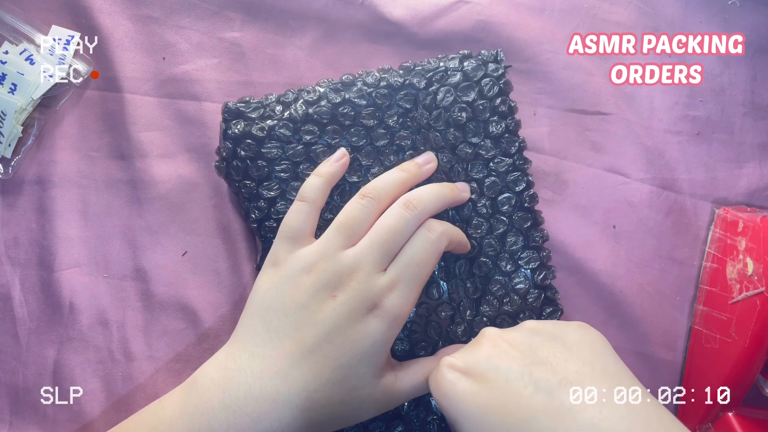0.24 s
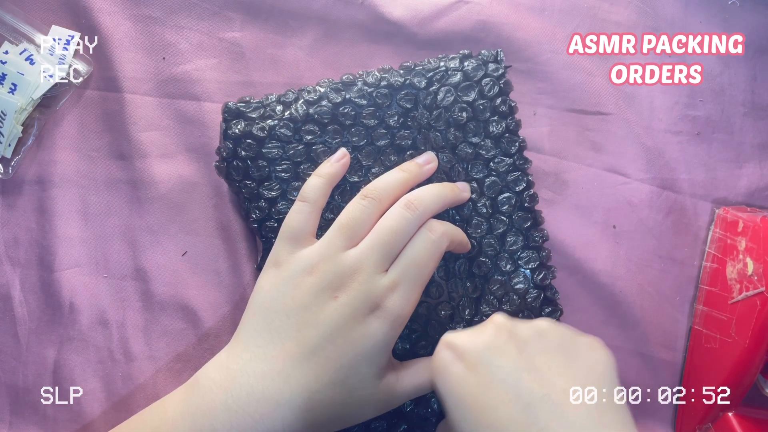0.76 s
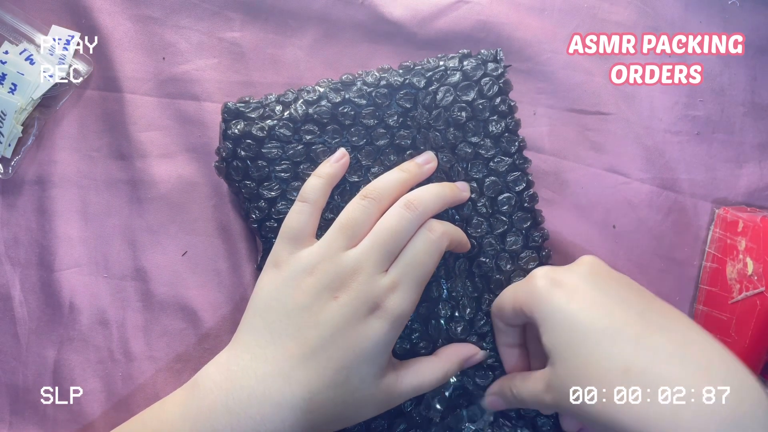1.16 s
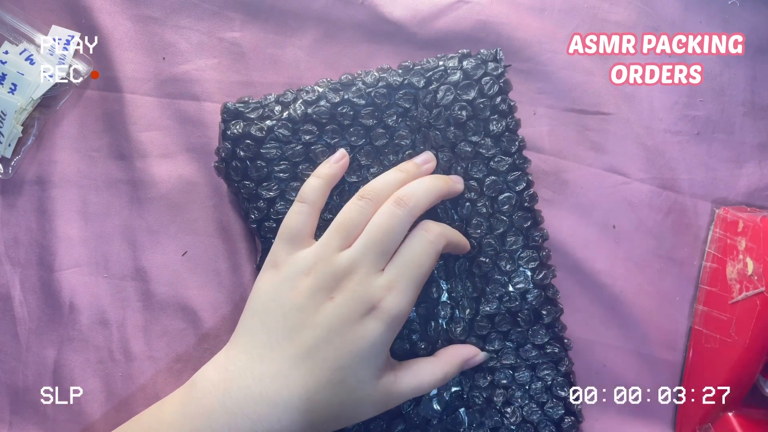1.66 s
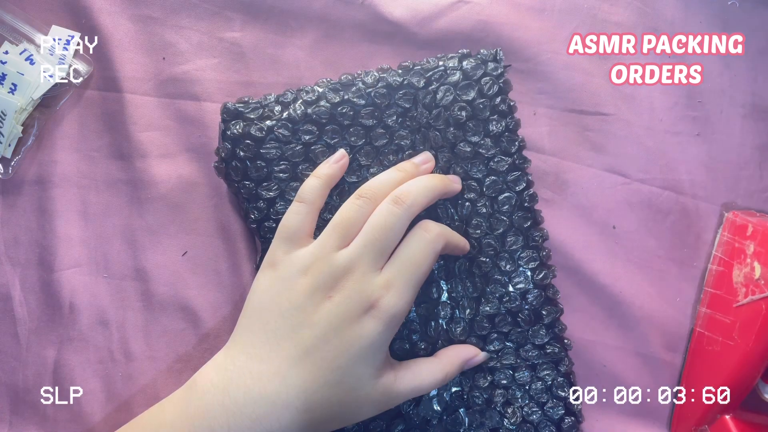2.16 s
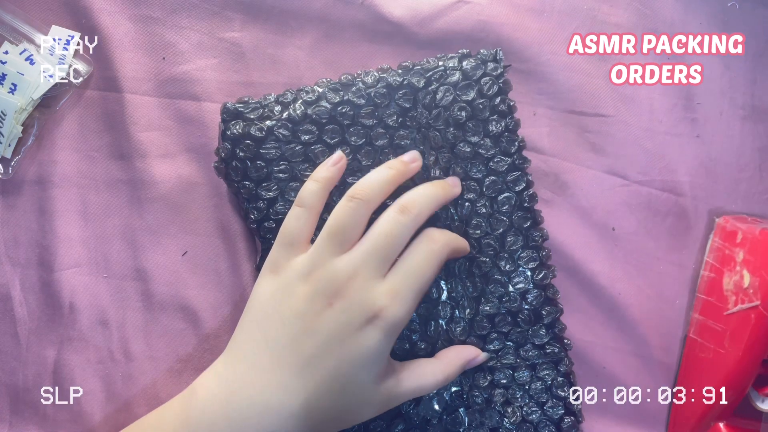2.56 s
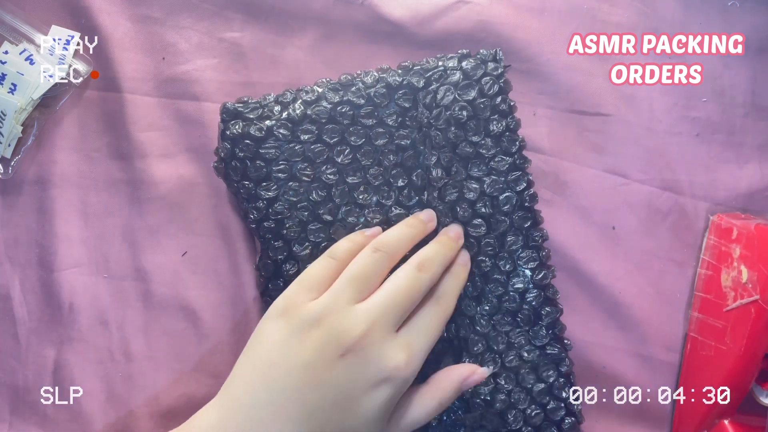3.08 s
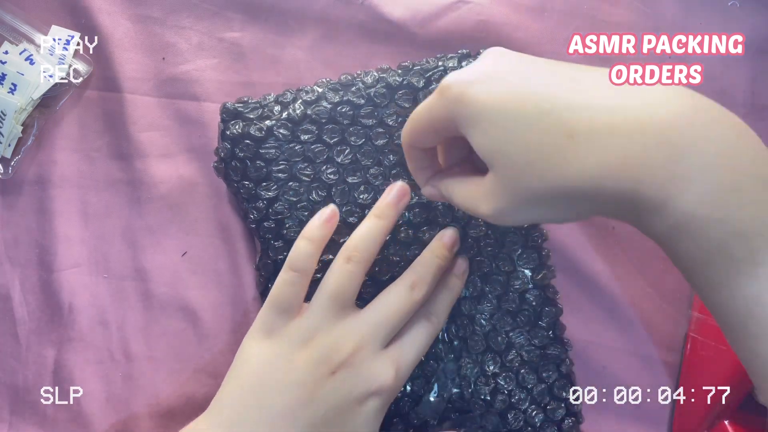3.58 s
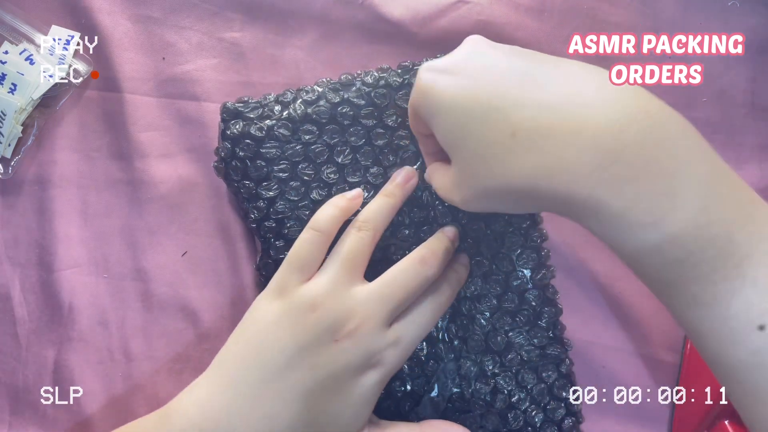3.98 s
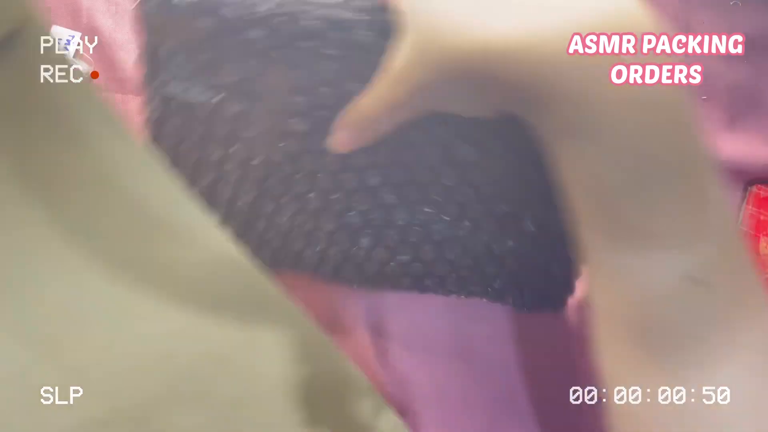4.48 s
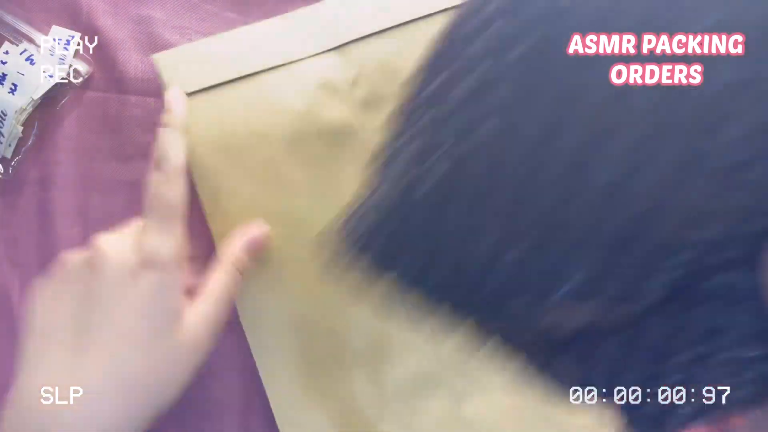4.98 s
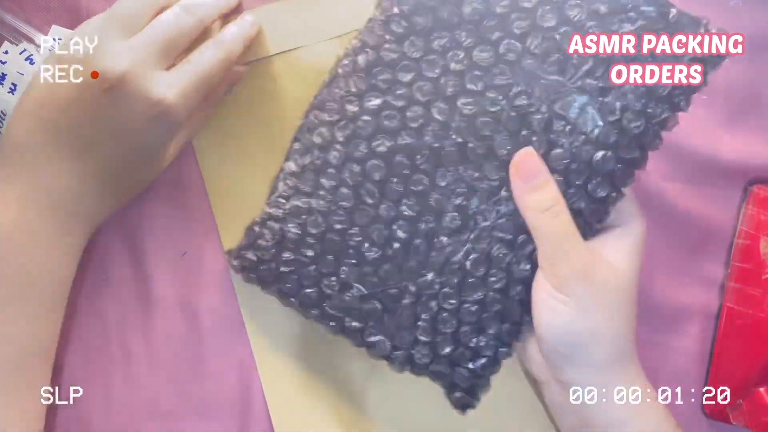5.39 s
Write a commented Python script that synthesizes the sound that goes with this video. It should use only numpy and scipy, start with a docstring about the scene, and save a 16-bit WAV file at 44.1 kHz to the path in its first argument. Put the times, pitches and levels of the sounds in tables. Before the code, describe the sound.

Close-up hands taping a bubble-wrapped parcel: crinkling film, crisp snaps, a quick tape pull, soft thumps and sliding rustles in a quiet room.

```python
"""Hands tape up a parcel of bubble wrap on a cloth-covered table, turn it and lay it on a paper envelope.
From the start a small soft room rumbles faintly, cloth rubs dully and film rustles: filtered noise.
Snaps soon join as noise bursts with hollow ringing pops; knocks ring the table modes from 0.7 s on.
A fingertip squeaks in gliding tones near 1 s, tape slips off the roll in a quick run of snaps near 2.1 s,
and hoarse gliding swishes follow to 4.7 s. Two close microphone ports hear it all with a phase shift."""
import sys
import numpy as np
from scipy import signal
from scipy.fft import rfft, irfft
from scipy.io import wavfile

SR = 44100
rng = np.random.default_rng(int(sys.argv[2]) if len(sys.argv) > 2 else 0)


def transcribe(u):
    """Save the signal u as a 16-bit wav file named by the first command-line argument.

    u: samples, shape (n,) or (channels, n), limited to [-1, 1]; the rate is SR.
    q: integer samples, one column per channel.
    """
    v = np.clip(np.atleast_2d(u).T, -1, 1)
    q = np.round(v * 32767).astype(np.int16)
    wavfile.write(sys.argv[1], SR, q)


N = 248724

# room rumble swelling and sinking: start_s, level_db
RUMBLE_LEVEL = [(0, -60.5), (1.8, -60.5), (2.1, -51.5), (2.6, -60), (3.5, -63), (4.3, -63.5), (5.64, -56.5)]
# rumble spectrum, relative: freq_hz, level_db
RUMBLE_SPECTRUM = [(20, -57), (34, -5), (59, -7.5), (98, -4.5), (150, -18.5), (205, -22), (265, -35),
                   (800, -45.5)]
RUB_DB, RUB_HZ = -16.5, (157, 356)   # gain over the low rustle level; band of the cloth rub

# hand movements on film, tape and paper: start_s (at full strength), hold_s, rustle_db, low_rel_db (to rustle)
MOVES = [(0.23, 0.015, -66.5, -13), (0.463, 0.26, -53.5, -1), (0.752, 0.014, -47, -1.5),
         (0.913, 0.17, -45, -1), (1.174, 0.023, -42, -1.5), (1.316, 0.031, -47, 1),
         (1.504, 0.16, -60.5, -0.5), (2.103, 0.02, -41, -0.5), (2.537, 0.012, -45, 2),
         (2.706, 0.084, -43, -1.5), (2.921, 0.075, -46.5, -3), (3.067, 0.31, -58, -1),
         (3.662, 0.53, -55, -7), (4.057, 0.11, -49.5, 2.5), (4.302, 0.0045, -46, 2.5),
         (4.436, 0.034, -38.5, -2), (4.51, 0.17, -48, 3), (4.636, 0.18, -47.5, 2), (4.813, 0.21, -54.5, 4),
         (5.13, 0.015, -61, 10), (5.228, 0.04, -44.5, -1.5), (5.333, 0.013, -44, 0.5),
         (5.53, 0.23, -53.5, 2.5)]
REST_DB, REST_LOW_DB = -81.5, 10.5   # the resting hand still rustles; low part relative to it
RISE_DB_PER_S, FALL_DB_PER_S = 239.5, 119   # for a movement at -50 dB
ABRUPTNESS = 0.15   # stronger movements start and stop faster (dB of slope per dB of level)

# snaps of film, tape and paper, relative levels: start_s, crack_db, hollow_pop_db, pop_hz
SNAPS = [(0.1098, -40, -56.5, 805), (0.316, -49, -64, 1070), (0.401, -50, -60.5, 1190),
         (0.517, -31.5, -43.5, 1220), (0.5372, -27, -39.5, 786), (0.588, -28.5, -45, 1260),
         (0.5934, -24, -43, 2220), (0.738, -22, -34.5, 890), (0.8535, -35.5, -55, 2180),
         (0.9586, -19.5, -27, 950), (0.9692, -20.5, -20.5, 950), (0.9776, -22, -21.5, 1160),
         (0.987, -22, -23, 820), (1.1486, -22.5, -43.5, 1330), (1.165, -38, -41, 930),
         (1.1844, -18.5, -33, 1330), (1.1931, -16.5, -31, 1110), (1.517, -21, -39, 2190),
         (1.593, -73, -47.5, 847), (1.6751, -34, -55.5, 1660), (1.8027, -35.5, -62.5, 1790),
         (1.9392, -18.5, -31, 1730), (1.9707, -15, -28, 1410), (2.0083, -23, -29, 1080),
         (2.023, -17.5, -37, 1490), (2.1572, -19, -28.5, 1750), (2.1637, -20, -34, 1060),
         (2.2459, -21.5, -29, 1640), (2.265, -10, -29, 1200), (2.449, -30.5, -50, 1700),
         (2.683, -29, -49, 1780), (2.6915, -8.5, -33.5, 1260), (2.8872, -37, -41, 795),
         (2.9263, -39, -31.5, 2130), (2.9408, -25, -40.5, 970), (3.0539, -25.5, -48.5, 794),
         (3.179, -29.5, -89, 1890), (3.2176, -30, -40, 1920), (3.35, -59.5, -44.5, 1026),
         (3.567, -53.5, -50.5, 1330), (3.619, -46, -48.5, 1480), (3.657, -41, -56, 940),
         (3.7906, -30, -72, 1670), (4.081, -22, -34, 900), (4.0855, -21, -40, 1490),
         (4.0928, -16, -19, 2150), (4.1225, -22, -44, 820), (4.1305, -22, -31, 1420),
         (4.1503, -28.5, -41.5, 790), (4.2085, -23.5, -39.5, 900), (4.2256, -13.5, -22, 1930),
         (4.2316, -18, -19, 2280), (4.2953, -21.5, -36.5, 825), (4.4285, -18.5, -43, 458),
         (4.446, -29, -44, 810), (4.643, -17, -39, 432), (4.6807, -26.5, -31.5, 2360),
         (4.787, -24, -26, 1090), (4.7938, -51, -29, 1040), (4.8546, -26, -44.5, 860),
         (5.104, -37.5, -40.5, 1710), (5.1975, -25.5, -39.5, 880), (5.229, -27, -34, 2010),
         (5.2382, -22, -38.5, 760), (5.247, -44, -31, 2000), (5.2522, -12.5, -30.5, 850),
         (5.262, -25, -50, 1090), (5.2682, -39, -32.5, 746), (5.2773, -11, -47, 760),
         (5.2877, -50, -35.5, 760), (5.306, -49, -38.5, 875), (5.363, -36, -36.5, 770),
         (5.372, -35, -39.5, 750), (5.38, -23.5, -63, 1500), (5.3855, -24.5, -29, 834),
         (5.5, -23, -36.5, 950), (5.5436, -44, -41, 780), (5.5896, -28.5, -35.5, 1510)]
# one pull of tape off the roll, slip by slip: start_s, crack_db (relative)
SLIPS = [(2.068, -11), (2.076, -14.5), (2.0803, -11), (2.088, -17), (2.0936, -11), (2.1007, -11.5),
         (2.1086, -15.5), (2.117, -24), (2.1193, -14), (2.1275, -20), (2.128, -25), (2.1343, -17),
         (2.1421, -19)]
SLIP_POP_DB, SLIP_POP_HZ = (-29.5, -41.5), (1430, 900)   # pop of the first and last slip

# what is handled sets the brightness, tape the brightest: start_s, tilt_db_per_octave (above 4 kHz)
BRIGHTNESS = [(0, -8.5), (.5, -6), (1.4, -9.5), (1.5, -6), (2.3, -0.5), (2.7, -6.5), (2.85, -7.5),
              (3.2, -5.5), (4.6, -6), (5.64, -8.5)]
BRIGHT_DIP = 1   # dB lost near 2.7 kHz per dB of brightness
# how long a crack rings by pitch: freq_hz, t60_s
CRACK_T60 = [(400, 0.063), (1500, 0.016), (5000, 0.011), (15000, 0.009)]
GRAINS_PER_S, GRAIN_SPREAD_DB = 800, 5   # crease rate at -46 dB rustle; scale of the random size
GRAIN_SHORTNESS = 0.3   # crease decay as a share of the crack decay
CREASE_COLOUR_DB, SMOOTH_DB = 4, -4   # colour spread between creases; steady slide beside them
SNAP_RISE_S = .0009
TICK_DB = 15   # sharp click inside the burst, relative to the snap
UNLIKE_DB = -12.5   # the part of the crackle that each port hears differently (less below 1.5 kHz)
POP_CYCLES = 6.3   # cycles until a pop has died by 60 dB
POP_TONE_DB, POP_NOISE_DB = 27, 14.5   # gains on hollow_pop_db
POP_FOCUS_DB = 3.5   # pop noise lost per octave above its pitch, 2.5 times as much below

ROOM_T60_S, ROOM_DB, ROOM_DULL_HZ = 0.2, -16, 5000   # decay ahead of the dulling, gain, treble cutoff

# knocks, relative levels: start_s, thump_db, thump_hz, table_db
KNOCKS = [(0.737, -43, 300, -50), (2.698, -40, 203, -26), (2.7224, -20.5, 187, -16),
          (4.298, -39.5, 188, -43), (4.876, -32, 216, -47), (5.332, -32, 220, -44.5),
          (5.345, -37, 185, -40)]
# ringing modes of the table: freq_hz, level_db (relative), t60_s
TABLE_MODES = [(67.3, -3, 0.25), (99, -2.5, 0.35), (171, -7, 0.32), (217, -6.5, 0.35), (316, -1, 0.13)]
THUD_DB, THUD_T60_S, THUD_HZ = -16, 0.18, (130, 380)   # rough dull noise of cloth and flesh in each knock

# fingertip squeaks on the film: start_s, length_s, start_hz, end_hz, level_db (ahead of SQUEAK_GAIN)
SQUEAKS = [(0.994, 0.027, 850, 1090, -14), (1.065, 0.011, 883, 1030, -17)]
SQUEAK_GAIN = 0.69
# hoarse song of peeling tape and sliding paper: start_s, length_s, start_hz, end_hz, level_db (relative)
SWISHES = [(2.108, 0.0464, 1043, 883, -23.5), (4.455, 0.025, 687, 810, -36),
           (4.498, 0.041, 1635, 2260, -41), (4.505, 0.085, 2480, 2280, -39),
           (4.582, 0.0087, 1300, 1400, -32), (4.654, 0.056, 2570, 3260, -38.5)]
SWISH_WIDTH_HZ = 220   # bandwidth of the noise that roughens a swish

# phase between the microphone ports: freq_hz, left_lead_rad
PORTS = [(0, 0), (900, -.4), (2200, 0), (3600, .8), (5200, -.1), (6980, 2.9), (8800, 3.6), (10100, 6.1),
         (12200, 6.6), (13300, 9.2), (14900, 9.5), (15700, 10.5)]
# microphone colour: freq_hz, gain_db
MIC = [(200, -5), (400, -4.5), (1000, -4), (2900, -4), (4500, 0), (8000, 1), (11000, 0.5), (12800, -7.5),
       (15700, 3), (16300, -18)]
HISS_DB, CUTOFF_HZ = -82, 17150   # hiss ahead of the microphone colour; top of the range


def amp(db):
    """Turns decibels into an amplitude factor."""
    return 10 ** (np.asarray(db) / 20)


def rms_one(x):
    """Scales a signal to an RMS of one."""
    return x / np.sqrt(np.mean(x ** 2) + 1e-20)


def in_time(rows):
    """Draws each column of a timed table as a curve with one value per sample."""
    s, *columns = np.transpose(rows)
    return [np.interp(np.arange(N) / SR, s, column) for column in columns]


def at_hz(points, hz):
    """Reads a frequency table between its points, along a logarithmic frequency axis."""
    table_hz, values = np.array(points).T
    return np.interp(np.log(hz + 1), np.log(table_hz + 1), values)


def coloured(x, points):
    """Applies a spectrum in dB."""
    return irfft(rfft(x) * amp(at_hz(points, np.fft.rfftfreq(N, 1 / SR))), N)


def filtered(x, order, hz, kind):
    """Passes a signal through a Butterworth filter."""
    return signal.sosfilt(signal.butter(order, hz, kind, fs=SR, output="sos"), x)


def train(s, db):
    """Places clicks of given size at given times."""
    out = np.full(N, 1e-18)
    np.add.at(out, np.round(np.asarray(s) * SR).astype(int), amp(db))
    return out


def dying(clicks, t60, rise_s):
    """Makes each click swell smoothly and die away, as the envelope of a burst."""
    swell = np.exp(-2 / (rise_s * SR))
    poles = np.convolve([1, -2 * swell, swell ** 2], [1, -amp(-60 / (t60 * SR))])
    return signal.lfilter([(1 - swell) ** 2], poles, clicks)


def glide(rows, flutter):
    """Sings gliding tones, each multiplied by a flutter."""
    out = np.zeros(N)
    for s, length, start_hz, end_hz, db in rows:
        u = np.linspace(0, 1, round(length * SR))
        turns = np.cumsum(start_hz + (end_hz - start_hz) * u) / SR
        tone = amp(db) * np.sin(np.pi * u ** 0.35) * np.sin(2 * np.pi * turns)
        out = out + np.pad(tone, (round(s * SR), N))[:N] * flutter
    return out


def handling():
    """Level of the rustle in dB, and of its low part relative to it; overlapping movements add up in power."""
    s, hold, db, low_db = np.transpose(MOVES)[:, :, None]
    t = np.arange(0, N, 32) / SR
    away_db = RISE_DB_PER_S * np.maximum(s - t, 0) + FALL_DB_PER_S * np.maximum(t - s - hold, 0)
    power = amp(2 * (db - amp(ABRUPTNESS * (db + 50.0)) * away_db))
    total = power.sum(axis=0) + amp(2 * REST_DB)
    low = (power * amp(2 * low_db)).sum(axis=0) + amp(2 * (REST_DB + REST_LOW_DB))
    return in_time(np.transpose([t, 10 * np.log10(total), 10 * np.log10(low / total)]))


def rumble():
    """Low room noise, carried by the table, swells and sinks slowly."""
    noise = rms_one(coloured(rng.standard_normal(N), RUMBLE_SPECTRUM))
    return amp(in_time(RUMBLE_LEVEL)[0]) * noise


def cloth_rub():
    """The parcel rubs dully on the cloth: low noise that follows the low part of the rustle."""
    rub = filtered(rng.standard_normal(N), 2, RUB_HZ, "band")
    return amp(sum(handling()) + RUB_DB) * rms_one(rub)


def all_snaps():
    """The single snaps and the slips of the tape pull, as rows of the same columns."""
    s, crack_db = np.transpose(SLIPS)
    slips = [s, crack_db, np.linspace(*SLIP_POP_DB, len(s)), np.geomspace(*SLIP_POP_HZ, len(s))]
    return np.vstack([SNAPS, np.transpose(slips)])


def crackle():
    """Snaps and countless small creases set off bursts of noise whose treble dies first."""
    s, crack_db, pop_db, pop_hz = all_snaps().T
    rustle_db, low_db = handling()
    tilt, = in_time(BRIGHTNESS)
    edges, out = 400 * 2 ** np.arange(0, 5.6, .5), 0   # half-octave bands
    white, unlike = rng.standard_normal((2, 2, N))
    busy = amp(0.33 * (rustle_db + 46.0))   # gentle handling creases the film less often
    born = rng.random(N) < busy * GRAINS_PER_S / SR
    sizes = born * amp(GRAIN_SPREAD_DB * np.minimum(rng.exponential(1, N), 4)) / np.sqrt(busy)
    shade = rng.standard_normal((len(edges), N))   # every crease has a colour of its own
    smooth = amp(SMOOTH_DB + np.clip(low_db, -4, 4))   # fuller material slides more smoothly
    for k, (low, high) in enumerate(zip(edges, edges[1:])):
        hz = np.sqrt(low * high)
        t60, deep = at_hz(CRACK_T60, hz), hz < 2200
        grains = dying(sizes * amp(CREASE_COLOUR_DB * shade[k]), GRAIN_SHORTNESS * t60, 0.0011)
        creases = rms_one(grains) + smooth
        # deep bands take their level from the pop, high bands from the crack
        focus_db = POP_FOCUS_DB * np.where(hz < pop_hz, 2.5, 1) * abs(np.log2(hz / pop_hz))
        body_db = pop_db + POP_NOISE_DB - focus_db
        clicks = train(s, (body_db if deep else crack_db) + 1.34 * shade[k, :len(s)])
        snaps = dying(clicks, t60, SNAP_RISE_S)
        tick = amp(TICK_DB) * np.roll(clicks, round(SNAP_RISE_S * SR)) * (not deep)
        level = snaps + creases * amp(rustle_db + (low_db + 3.0) * deep + 1.0)
        apart = amp(UNLIKE_DB) * min(hz / 1500, 1) * unlike[k % 2] * [[1], [-1]]
        burst = filtered(level * (white[k % 2] + apart) + tick, 2, [low, high], "band")
        treble_db = tilt * max(np.log2(hz / 4000), 0)
        # bright, thin material also has less body below 800 Hz
        bass_db = (tilt + 2.5) * 1.4 * min(np.log2(hz / 800), 0)
        dip_db = BRIGHT_DIP * (tilt + 6) * (2200 < hz < 3200)
        out = out + burst * amp(treble_db + bass_db - dip_db)
    return out


def pops():
    """The air pocket under each snap rings a few cycles as a dying sine."""
    out = np.zeros(N + SR)
    t = np.arange(round(.03 * SR)) / SR
    for s, _, db, hz in all_snaps():
        shape = (1 - np.exp(-t / .001)) ** 2 * amp(-60 * t * hz / POP_CYCLES)
        out[round(s * SR):][:len(t)] += amp(db + POP_TONE_DB) * shape * np.sin(2 * np.pi * hz * t)
    return out[:N]


def room(x):
    """A dull, dying spray of reflections, different for each port."""
    t = np.arange(SR // 2) / SR
    spray = rng.standard_normal((2, len(t))) * amp(-60 * t / ROOM_T60_S) * np.minimum(t / 0.00073, 1)
    spray = filtered(spray, 1, ROOM_DULL_HZ, "low")
    spray = spray / np.sqrt(np.sum(spray[0] ** 2))
    return amp(ROOM_DB) * signal.fftconvolve(x[None], spray, axes=1)[:, :N]


def ring(clicks, hz, t60):
    """A resonance: each push sets off a sine that dies away."""
    r, w = amp(-60 / (t60 * SR)), 2 * np.pi * hz / SR
    return signal.lfilter([0, np.sin(w)], [1, -2 * r * np.cos(w), r * r], clicks)


def knocks():
    """A soft contact pushes the table's modes; the air under hand or parcel thumps about three cycles."""
    push, thumps = np.full(N, 1e-18), np.zeros(N)
    for s, thump_db, hz, table_db in KNOCKS:
        start = round(s * SR)
        bump = np.hanning(round(SR / hz))
        push[start:][:len(bump)] += amp(table_db) * bump / bump.sum()
        u = np.linspace(0, 1, round(3.2 * SR / hz))
        tone = np.sin(2 * np.pi * hz * np.arange(len(u)) / SR)
        thumps[start:][:len(u)] -= amp(thump_db) * np.sin(np.pi * u ** 0.55) ** 2 * tone
    noise = filtered(rng.standard_normal(N), 2, THUD_HZ, "band")
    thuds = amp(THUD_DB) * dying(push, THUD_T60_S, 0.0014) * rms_one(noise)
    # neighbouring modes ring with opposite sign
    modes = sum(amp(db) * ring(push, hz, t60) * (-1) ** k for k, (hz, db, t60) in enumerate(TABLE_MODES))
    return thumps + thuds + modes


def squeaks():
    """A fingertip on the film squeaks in short, pure gliding tones."""
    return glide(SQUEAKS, SQUEAK_GAIN)


def swishes():
    """Peeling tape and sliding paper sing hoarsely: gliding tones multiplied by slow noise."""
    return glide(SWISHES, rms_one(filtered(rng.standard_normal(N), 2, SWISH_WIDTH_HZ, "low")))


def scene():
    """Mixes the handled film, tape and paper, their reflections, the knocks and the low noises."""
    handled = crackle() + pops() + squeaks() + swishes()
    near = filtered(handled, 5, 500, "high")   # light film radiates little bass
    return rumble() + cloth_rub() + near + room(near.mean(axis=0)) + knocks()


def record(dry):
    """The ports shift the phase against each other and colour the sound; faint hiss; the top is cut."""
    lead = np.interp(np.fft.rfftfreq(N, 1 / SR), *np.transpose(PORTS))
    heard = dry + amp(HISS_DB) * rng.standard_normal((2, N))
    heard = irfft(rfft(heard) * np.exp(.5j * lead * [[1], [-1]]), N)   # half the lead to each side
    low = filtered(heard, 2, [36, 350], "band")   # added bass path
    top_cut = signal.cheby2(12, 70, CUTOFF_HZ, fs=SR, output="sos")
    return signal.sosfilt(top_cut, low + coloured(heard, MIC))


dry = scene()
out = record(dry)
transcribe(out)
```